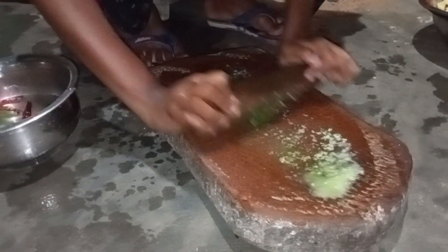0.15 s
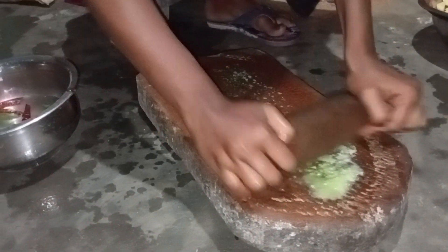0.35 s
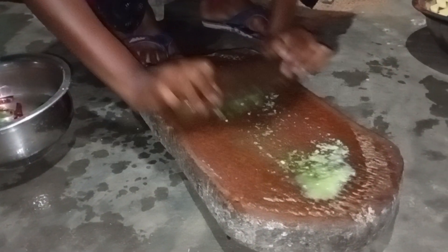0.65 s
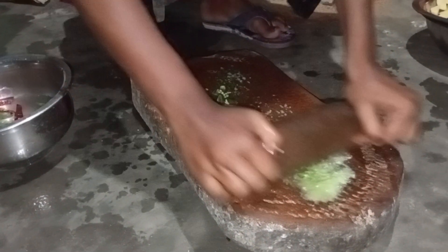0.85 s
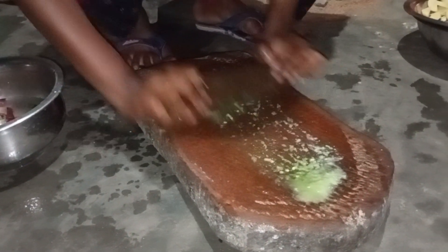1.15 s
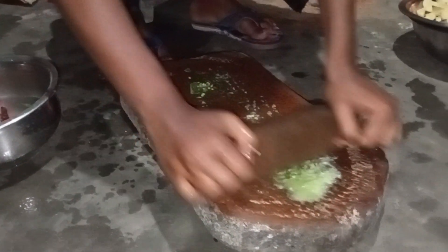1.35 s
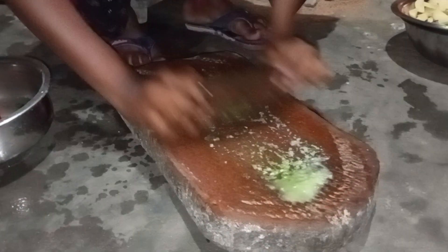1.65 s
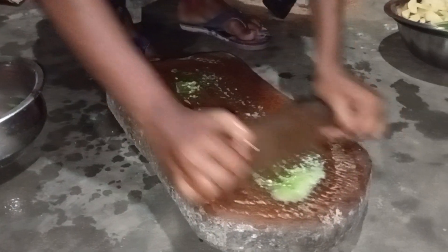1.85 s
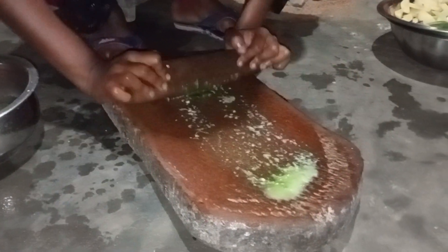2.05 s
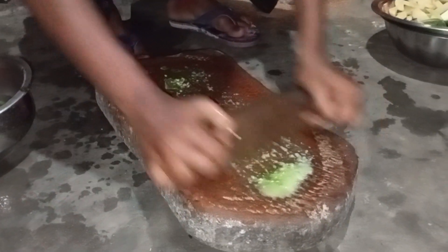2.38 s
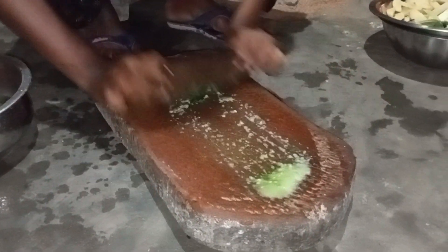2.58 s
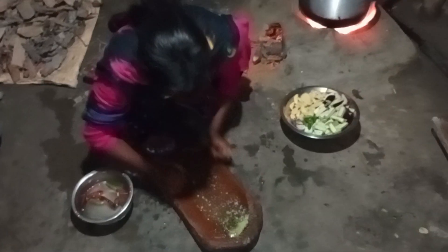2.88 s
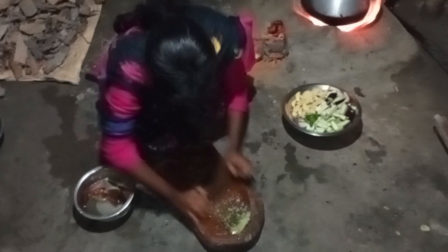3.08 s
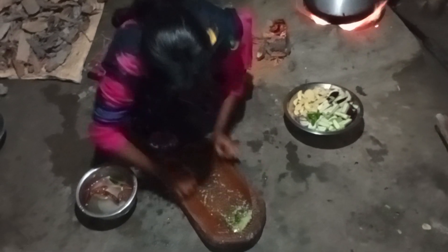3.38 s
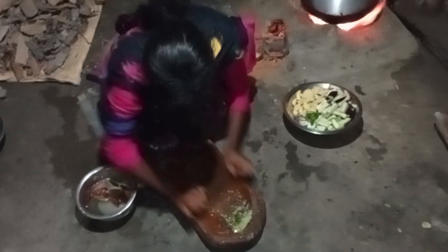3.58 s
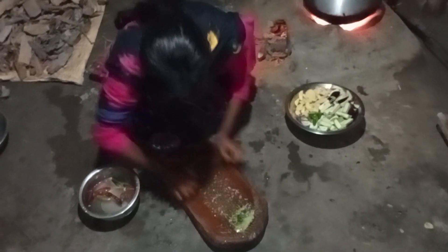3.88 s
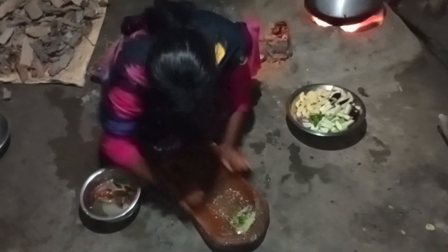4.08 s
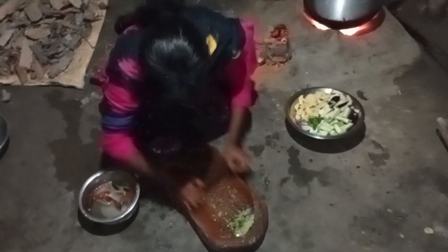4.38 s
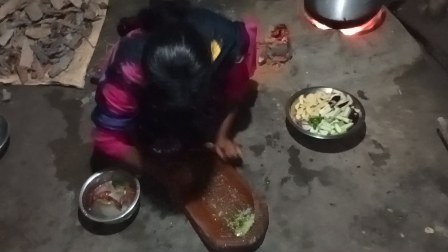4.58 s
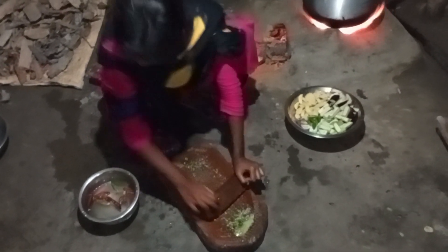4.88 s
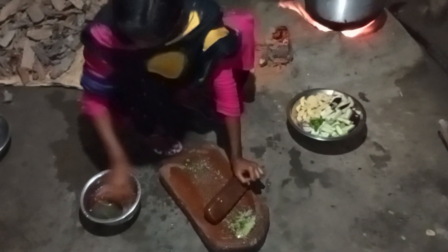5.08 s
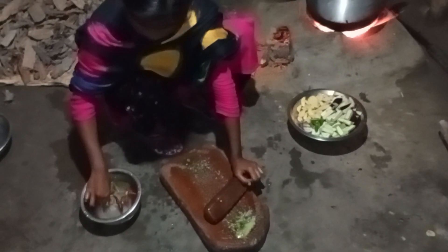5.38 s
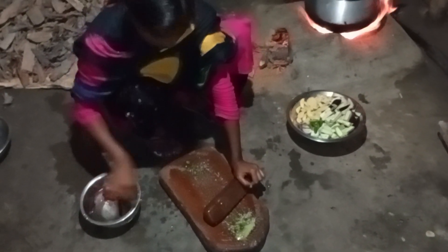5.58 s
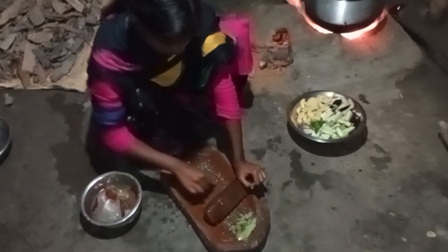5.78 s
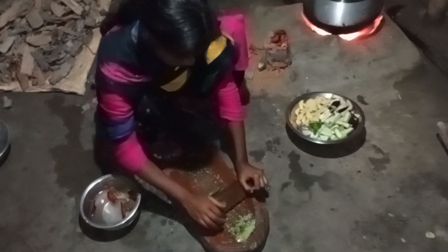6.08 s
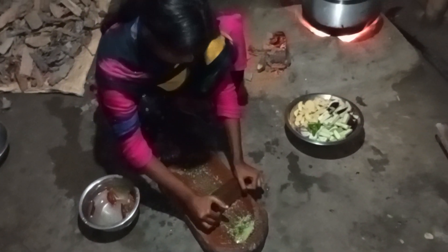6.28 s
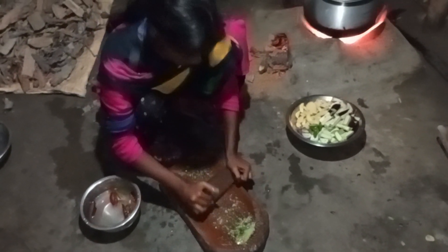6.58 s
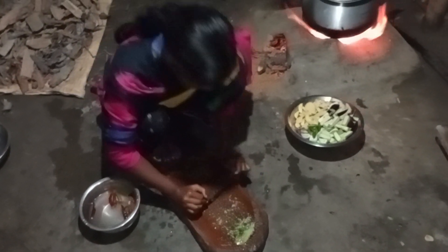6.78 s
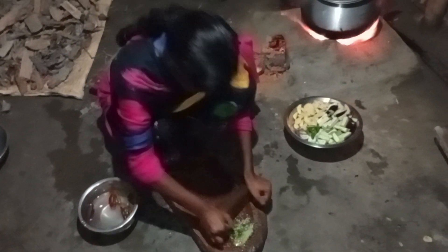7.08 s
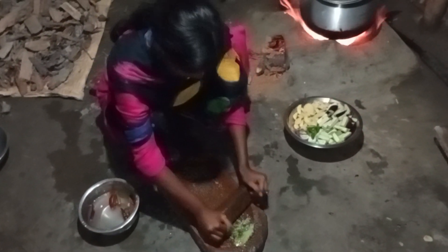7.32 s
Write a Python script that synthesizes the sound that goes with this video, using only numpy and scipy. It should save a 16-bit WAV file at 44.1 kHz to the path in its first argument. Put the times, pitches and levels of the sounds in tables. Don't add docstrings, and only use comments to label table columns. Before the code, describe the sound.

Rapid gritty grinding strokes on stone, with wet squelches and knocks; later lower-toned, then bangles clink, a steel bowl hums and the roller knocks again.

```python
import sys
import numpy as np
from scipy import signal
from scipy.fft import rfft, irfft, next_fast_len
from scipy.io import wavfile

SR = 44100
rng = np.random.default_rng(int(sys.argv[2]) if len(sys.argv) > 2 else 0)


def log_audio(samples):
    frames = np.atleast_2d(samples).T
    limited = np.clip(frames, -1, 1)
    pcm = np.round(limited * 32767).astype(np.int16)
    wavfile.write(sys.argv[1], SR, pcm)


def makeup_ratio(level_db):
    decades = np.asarray(level_db, float) / 20
    return 10 ** decades


N = 328545
SCENE_CHANGES_S = 2.78


# start in seconds, share of the stroke (0-1) at which it is fastest,
# grit level in dB, slush level in dB, song level in dB.
STROKES = [(0.234, 0.45, -42.5, -50, -56), (0.507, 0.72, -41, -55.5, -71),
           (0.773, 0.44, -37.5, -52.5, -55.5), (1.011, 0.61, -39.5, -55, -54), (1.264, 0.4, -38, -53, -50),
           (1.544, 0.47, -39, -59.5, -56.5), (1.768, 0.45, -39.5, -51.5, -47.5),
           (2.0, 0.57, -40.5, -55.5, -50.5), (2.255, 0.45, -41.5, -52, -48.5),
           (2.499, 0.56, -41, -56.5, -55.5), (2.743, 0.35, -45, -60, -53.5), (2.873, 0.47, -43.5, -73, -50),
           (3.132, 0.44, -45, -61.5, -39.5), (3.394, 0.57, -46.5, -70, -42.5), (3.656, 0.42, -47, -61, -37),
           (3.911, 0.53, -46, -66, -44.5), (4.172, 0.46, -46.5, -56, -33), (4.432, 0.54, -48, -69, -40),
           (4.704, 0.22, -51, -58.5, -37), (7.042, 0.27, -52.5, -54, -39)]


def stroking(db, power, creep_db, late=0):
    longest_s, creep_s = 0.285, 0.03
    start, fastest = np.transpose(STROKES)[:2, :, None]
    t = milliseconds()
    since = t - start
    length = np.minimum(np.diff(start, axis=0, append=np.inf), longest_s)
    bend = np.log(0.5) / np.log(np.clip(fastest + late, 0.15, 0.85))
    speed = np.sin(np.pi * np.clip(since / length, 0, 1) ** bend).clip(0)
    is_push = (np.arange(len(start)) % 2 == 0)[:, None]
    follows_on = np.diff(start, axis=0, prepend=-np.inf) < longest_s
    creep = is_push * follows_on * makeup_ratio(creep_db) * np.exp(-(since / creep_s) ** 2)
    return np.sum(makeup_ratio(db)[:, None] * (speed ** power + creep), axis=0)


SONG_LATE = [0.061, -.1, 0.083, -0.15, -0.068, -0.052, -0.077, -.15, -0.12, -0.15, -0.06, -0.036, .1, -0.12,
             0.023, -.1, -0.043, 0.032, 0.059, -0.2]
# start in seconds, hold in seconds,
# grit level in dB, slush level in dB, song level in dB.
SCUFFS = [(0.067, 0.022, -42.5, -53, -68), (0.134, 0.017, -45, -48.5, -72), (0.289, 0.012, -38.5, -52, -84),
          (0.361, 0.018, -34.5, -50, -79), (0.534, 0.054, -58, -64.5, -59.5),
          (0.796, 0.013, -49.5, -58, -49), (2.494, 0.0063, -86, -67, -73), (4.643, 0.035, -58, -58.5, -53),
          (5.093, 0.092, -48.5, -52.5, -65), (5.201, .42, -68, -65.5, -78), (5.631, 0.016, -56, -53, -68),
          (5.849, 0.021, -61, -59, -59), (5.97, 0.66, -66.5, -72.5, -82), (6.337, 0.027, -47, -47.5, -64),
          (6.39, 0.1, -54.5, -106.5, -74), (6.413, 0.26, -63.5, -57.5, -41),
          (6.671, 0.046, -68, -59, -41.5), (6.794, 0.12, -72.5, -72.5, -76),
          (6.914, 0.017, -56, -47.5, -82), (7.119, 0.026, -44, -57, -77), (7.358, 0.023, -60.5, -56, -78),
          (7.39, 0.053, -55, -61, -78)]
# start in seconds, hold in seconds, level in dB.
JOLTS = [(0.07, .01, -51), (0.14, .01, -53), (0.42, 0.014, -48.5), (0.57, 0.02, -41), (0.68, 0.0092, -51),
         (0.84, 0.0082, -44), (0.91, 0.0076, -39.5), (1.07, 0.0071, -42.5), (1.44, 0.0075, -42),
         (1.52, 0.027, -42.5), (1.915, 0.0076, -35.5), (2.04, 0.039, -42), (2.41, 0.012, -39.5),
         (2.49, 0.071, -46.5), (3.25, 0.069, -51.5), (3.75, 0.08, -52), (5.09, 0.031, -39.5),
         (5.15, 0.46, -57.5), (5.63, 0.018, -46), (5.85, 0.58, -63), (6.335, 0.055, -41.5),
         (6.45, 0.45, -58.5), (6.92, 0.011, -45.5), (7.22, 0.017, -44.5), (7.36, 0.085, -47)]


def rubbing():
    grit_db, slush_db, song_db = np.transpose(STROKES)[2:]
    scuffs = np.array(SCUFFS)
    grit_scuff, slush_scuff, song_scuff = [
        gestures(scuffs[:, [0, 1, k]], rise_s=0.0027, fall_db_per_s=235.5) for k in (2, 3, 4)]
    jolts = gestures(JOLTS, rise_s=0.0034, fall_db_per_s=392)
    late = np.array(SONG_LATE)[:, None]
    layers = [stroking(grit_db, 2.21, -22.5) + grit_scuff,
              stroking(slush_db, 2, -22.5) + slush_scuff,
              stroking(song_db, 3.27, -29, late) + song_scuff,
              stroking(slush_db - 7.5, 2.6, -22.5) + jolts]
    rest_db = (-68, -76.5, -79.5, -67)
    return [as_db(layer + makeup_ratio(rest)) for layer, rest in zip(layers, rest_db)]


# frequency in Hz, level in dB per Hz.
GRIT = [(2060, -49.5), (3500, -10), (4510, -7.5), (5290, -5), (7130, -1), (9260, 3.5), (10400, 1),
        (14900, -11.5), (16000, -20.5)]
# frequency in Hz, level in dB per Hz.
SLUSH = [(900, -25), (1500, -7), (2200, -2), (2750, 6), (3300, 3), (4500, -3.5), (6500, -48)]


def grit(hiss_db, slush_db):
    chatter = makeup_ratio(1.6 * drift(56))
    hiss = makeup_ratio(hiss_db - 0.5) * rms_one(colour(spread(9000, 2.8, 0.3), GRIT))
    dull = signal.sosfilt(signal.butter(2, 11510, fs=SR, output="sos"), hiss)
    t = np.arange(N) / SR
    hiss = np.where((t > 4.95) & (t < 7.04), dull, hiss)
    slush = makeup_ratio(slush_db) * rms_one(colour(spread(5000, 3.4, 0.18), SLUSH))
    return patchy(chatter * (hiss + slush), patch_db=1.45)


def spread(per_s, spread_db, shared):
    common, *own = grains(per_s, spread_db, (3, N))
    both = later_right(np.array([common, common]), 0.000206)
    return np.sqrt(shared) * both + np.sqrt(1 - shared) * np.array(own)


def patchy(x, patch_db):
    size = next_fast_len(N)
    edges = 1500 * 2 ** np.arange(0, 3.6, 0.5)
    spectrum = rfft(x, size)
    band = np.searchsorted(edges, np.arange(size // 2 + 1) * SR / size)
    out = np.zeros_like(x)
    for k in range(len(edges) + 1):
        out += makeup_ratio(patch_db * drift(11.0)) * irfft(spectrum * (band == k), size)[:, :N]
    return out


# frequency in Hz, level in dB per Hz.
SLAB = [(120, -29.5), (250, 2.5), (400, 0.5), (700, -9), (1000, -10.5), (1800, -18.5), (2500, -28)]
# frequency in Hz, level in dB, 60 dB decay in seconds.
RUBBED_NEAR = [(1260, -3, .06), (1320, 0, .055), (1480, -14, .03), (2870, -9, .014)]
# frequency in Hz, level in dB, 60 dB decay in
# seconds.
RUBBED_FAR = [(265, -7, .06), (700, -19, .06), (1040, -11, .07), (1228, 0, .1), (1300, -12, .05),
              (1480, -10, .035), (2700, -6, .03), (2860, -8, .03)]


def grinding(song_db, slab_db):
    slab = rms_one(colour(grains(2000, 2.8), SLAB))
    lumps_db = 2.0 * drift(30)
    song_db = song_db + 0.15 * lumps_db
    force = grains(5600, 0.84)
    near = np.arange(N) < SCENE_CHANGES_S * SR
    song = driven(RUBBED_NEAR, force * near, song_db - 0.5)
    song += driven(RUBBED_FAR, force * ~near, song_db - 8.5)
    return makeup_ratio(slab_db - 5.5 + lumps_db) * slab + song


# frequency in Hz, level in dB, 60 dB decay in seconds.
ROLLER = [(434, -18.5, 0.025), (687, -24, 0.037), (1075, -24.5, 0.08), (1249.4, 6.5, 0.065),
          (1301, -7, 0.039), (1410, -9, 0.093), (1470, -15.5, 0.07), (1667, -26.5, .06), (1860, -25, .07),
          (2140, -27.5, .05), (2530, -16.5, .09), (2695, -14, 0.073), (2955, -19.5, .06)]
# frequency in Hz, level in dB per Hz.
SCATTER = [(400, -28), (650, -8), (900, -12), (1500, 3.5), (2000, -8), (2700, -9), (3400, -17.5),
           (4500, -34)]
# time in seconds, peak in dB, scattered grit in dB, left minus right in dB.
KNOCKS = [(0.144, 1, -18, 3), (0.582, -43.5, -13, 4), (0.595, -40.5, -13, 6), (0.7375, -29, -11.5, 1.5),
          (0.806, -47, -18, 2), (0.848, -36, -25, 4), (0.916, -21, -15.5, 2), (1.916, -42.5, -31, 8),
          (2.413, -44, -2, 0), (2.483, -46, -8, 1), (2.777, -44, -24, 0), (3.19, -30, -10, -0.5),
          (3.244, -33, -27, -1), (3.599, -43, -6, 1), (3.71, -45, -11, -6), (4.125, -34.5, -14.5, 0),
          (4.242, -48, -11, -2), (4.756, -46.5, 4, 2), (6.79, -30.5, -18, 1), (6.844, -45.5, -22, -1),
          (6.925, -18, -14, -0.5), (7.227, -32, -11.5, -2)]


def knocks():
    s, db, scatter_db = np.transpose(KNOCKS)[:3]
    db = np.minimum(db, -6)
    luck_db = rng.normal(0, 1.5, (len(s), len(ROLLER)))
    t = np.arange(N) / SR
    gripped = (t > 0.3) & (t < 4.9)
    far = t > SCENE_CHANGES_S
    out = np.zeros(N)
    for k, (hz, level_db, t60) in enumerate(ROLLER):
        clicks = np.zeros(N + SR)
        strength = makeup_ratio(db + level_db - 6.5 + luck_db[:, k])
        second_s = s + round(0.003 * hz) / hz
        clicks[(s * SR).astype(int)] = strength
        clicks[(second_s * SR).astype(int)] = 0.65 * strength
        blunt = signal.butter(1, [hz / 1.25, hz * 1.25], "band", fs=SR, output="sos")
        swell = signal.sosfilt(blunt, clicks[:N])
        for held in (False, True):
            struck = swell * (gripped == held)
            decay = t60 * 0.84 ** held
            out += ring(struck * ~far, hz, decay)
            out += ring(struck * far, hz * 0.988, decay)
    blows = np.zeros(N)
    blows[(s * SR).astype(int)] = makeup_ratio(db + scatter_db)
    dying = signal.lfilter([1], [1, -makeup_ratio(-60 / (0.11 * SR))], blows + 1e-18)
    return out + dying * rms_one(colour(rng.standard_normal(N), SCATTER))


def leaning(x):
    s, pan_db = np.transpose(KNOCKS)[[0, 3]]
    latest = np.maximum(np.searchsorted(s, np.arange(N) / SR) - 1, 0)
    side_db = pan_db[latest]
    return x * makeup_ratio([side_db / 2, -side_db / 2])


# time in seconds, peak in dB, frequency in Hz, 60 dB decay in seconds.
THUMPS = [(0.419, -29, 200, 0.077), (0.921, -24.5, 168, 0.1), (1.439, -20.5, 175.3, 0.063),
          (1.916, -21, 179, 0.054), (2.07, -29.5, 204.6, 0.13), (2.42, -27, 171, 0.11),
          (2.771, -21, 59.3, 0.052), (3.191, -35, 248, 0.2), (3.719, -32, 260, 0.13),
          (4.12, -35.5, 260.5, 0.18), (4.249, -25.5, 269, 0.049), (4.57, -35, 189.6, 0.26),
          (4.75, -41.5, 275.6, 0.37), (5.135, -29, 328, 0.14), (6.38, -36, 335, 0.15)]


def thumps():
    return pushed(THUMPS, rise_s=0.0084)


# time in seconds, peak in dB, pitch in Hz.
CRACKS = [(0.0762, -17, 10400), (0.1282, -24, 6960), (0.1758, -22, 7200), (0.2514, -30, 9270),
          (0.2793, -22, 6400), (0.2943, -27, 8730), (0.3797, -10, 7800), (0.3884, -4, 6500),
          (0.4135, -5.5, 8550), (0.6827, -31, 9800), (0.8135, -17.5, 9200), (1.143, -39, 9200),
          (2.1123, -30, 9200), (2.5876, -23, 9750), (4.0482, -19, 10300), (4.5065, -22.5, 9860),
          (5.6335, -35, 8280), (6.3377, -30, 8670), (7.1286, -18, 10500), (7.401, -29.5, 7500)]


def cracks():
    out, t = np.zeros(N + 400), np.arange(400) / SR
    for s, db, hz in CRACKS:
        i = int(s * SR)
        out[i:i + 400] += makeup_ratio(db - 6.0) * np.sin(2 * np.pi * hz * t) * np.exp(-t / 0.00049)
    return out[:N]


# time in seconds, peak in dB, frequency in Hz, 60 dB decay in seconds.
DRIPS = [(4.645, -47, 875, 0.043), (4.665, -42, 770, 0.055), (4.68, -43, 900, 0.052),
         (4.7, -46.5, 830, 0.04), (5.85, -53.5, 1125, 0.083), (5.852, -52.5, 3050, 0.085),
         (6.01, -49.5, 3090, .06), (6.03, -61, 1890, 0.26), (6.09, -58, 1860, 0.2), (6.21, -61, 1790, 0.22),
         (6.345, -44.5, 890, 0.079)]


def drips():
    return pushed(DRIPS, rise_s=0.00061)


# frequency in Hz, level in dB, 60 dB decay in seconds.
BANGLES = [(7210, 0, .1), (8230, -5, .12), (8520, -1, .1), (9780, -3, .1), (9990, -5, .1),
           (12000, -14, .08)]
# start in seconds, hold in seconds, level in dB.
JINGLE = [
    (1.45, 0.036, -47),
    (5.13, 0.06, -50),
    (5.64, .01, -59),
    (6.385, .005, -36),
    (6.445, 0.042, -40.5),
    (7.395, 0.0027, -33.5),
    (7.42, .03, -58),
]


def bangles():
    jingle_db = as_db(gestures(JINGLE, rise_s=0.0033, fall_db_per_s=612))
    clinks = grains(600, 3.0) * (jingle_db > -66)
    return driven(BANGLES, clinks, jingle_db)


# frequency in Hz, level in dB, 60 dB decay in seconds.
BOWL = [(302.2, 12.5, 0.21), (335, 18.5, 0.203), (870, -5, 0.043), (2720, -2, .05), (2930, 3, 0.06)]
# start in seconds, hold in seconds, level in dB.
STIR = [
    (5.09, 0.019, -34.5),
    (5.13, 0.01, -32),
    (5.18, 0.34, -40.5),
    (5.5, 0.16, -55.5),
    (5.85, 0.27, -44),
    (6.34, 0.012, -30.5),
    (6.6, 0.26, -50),
    (6.85, 0.25, -41.5),
    (7.38, .07, -40),
]


def bowl():
    stir_db = as_db(gestures(STIR, rise_s=0.0089, fall_db_per_s=230))
    return driven(BOWL, grains(2000, 1.7), stir_db - 9.0)


# start in seconds, hold in seconds, level in dB.
CRICKET = [
    (3.33, 1.06, -64.5),
    (6.1, 0.76, -64),
]


def cricket():
    t = np.arange(N) / SR
    chirps_per_s, note_hz = 21.35, 5530
    throb = np.maximum(np.sin(2 * np.pi * chirps_per_s * t + 0.1), 0)
    song_db = as_db(gestures(CRICKET, rise_s=0.037, fall_db_per_s=400)) + 2.0 * drift(10)
    return makeup_ratio(song_db) * throb * np.sin(2 * np.pi * note_hz * t)


# time in seconds, firing rate in Hz, level in dB.
ENGINE = [
    (0, 25.94, -47),
    (.6, 26.78, -44.5),
    (1.2, 29.27, -45),
    (1.9, 31.98, -50),
    (2.55, 35.37, -50),
    (2.76, 35.15, -51),
]
# multiple of the firing rate, level in dB.
ENGINE_ORDERS = [(2, -34), (3, -13), (4, 0.5), (5, -1.5), (6, -3.5), (7, -27.5), (8, -51.5)]


def engine():
    gone = (2.79, 34.8, -103)
    firing_hz, level_db = in_time(list(ENGINE) + [gone])
    turn = 2 * np.pi * np.cumsum(firing_hz) / SR
    orders = sum(makeup_ratio(db + 2.3 * drift(36)) * np.sin(k * turn + k * k) for k, db in ENGINE_ORDERS)
    return makeup_ratio(level_db) * orders


# frequency in Hz, level in dB.
HUM = [(51.2, -36.5), (102.3, -1.5), (204.6, -7.5)]
# time in seconds, rumble in dB, hum in dB.
BACK = [
    (0.0, -49.5, -83),
    (0.37, -48, -47),
    (2.24, -49.5, -42),
    (2.92, -50, -48),
    (5.23, -50, -51.5),
    (6.25, -50.5, -48.5),
    (6.56, -46, -56),
    (7.05, -52.5, -50.5),
    (7.45, -52, -52),
]


def mains_hum():
    t = np.arange(N) / SR
    hum = sum(makeup_ratio(db + 2 * drift(4.8)) * np.sin(2 * np.pi * hz * t) for hz, db in HUM)
    return makeup_ratio(in_time(BACK)[1] - 1.5) * hum


# frequency in Hz, level in dB per Hz.
RUMBLE = [(25, -47), (40, -12), (52, 2), (75, -6.5), (105, 2), (150, -1), (210, -2.5), (300, -7.5),
          (400, -16), (600, -23.5), (1000, -46.5), (2000, -80)]
# frequency in Hz, level in dB per Hz.
AIR = [(410, -48), (700, 3.5), (819, -41), (1870, -7.5), (2020, -6), (3940, -13.5), (5760, -4),
       (6320, -6.5), (8990, -8.5), (12500, -24.5), (16000, -42)]


def background():
    rumble = rms_one(colour(alike_below(rng.standard_normal((3, N))), RUMBLE))
    air = rms_one(colour(alike_below(rng.standard_normal((3, N))), AIR))
    return makeup_ratio(in_time(BACK)[0] + 0.9 * drift(6.0)) * rumble + makeup_ratio(-65) * air


def alike_below(noise):
    b, a = signal.butter(1, 600, "high", fs=SR)
    return noise[0] + signal.lfilter(b, a, noise[1:] - noise[0])


def room():
    t60_s, tail_db = 0.26, -8.0
    t = np.arange(int(0.4 * SR)) / SR
    tail = alike_below(rng.standard_normal((3, len(t)))) * makeup_ratio(-60 * t / t60_s) * (t > 0.003)
    tail *= makeup_ratio(tail_db) / np.sqrt(np.sum(tail ** 2, axis=1, keepdims=True))
    tail[:, 0] += 1
    return tail


def heard(x, tail):
    return later_right(signal.fftconvolve(x[None], tail, axes=1)[:, :N], 0.00012)


def later_right(x, lag_s):
    return np.array([x[0], np.interp(np.arange(N) - lag_s * SR, np.arange(N), x[1])])


def milliseconds():
    return np.arange(N * 1000 // SR + 2) / 1000


def gestures(rows, rise_s, fall_db_per_s):
    start, hold_s, db = np.transpose(rows)[:, :, None]
    t = milliseconds() - start
    attack = np.clip(t / rise_s, 0, 1) ** 2
    released_s = np.maximum(t - rise_s - hold_s, 0)
    return np.sum(attack * makeup_ratio(db - fall_db_per_s * released_s), axis=0)


def as_db(pressure):
    t = np.arange(N) / SR
    return 20 * np.log10(np.interp(t, np.arange(len(pressure)) / 1000, pressure) + 1e-6)


def in_time(rows):
    s, *columns = np.transpose(rows)
    return [np.interp(np.arange(N) / SR, s, c) for c in columns]


def rms_one(x):
    return x / np.sqrt(np.mean(x ** 2) + 1e-20)


def colour(x, points):
    size = next_fast_len(N)
    hz, db = np.transpose(points)
    bins_hz = np.arange(size // 2 + 1) * SR / size
    gain = makeup_ratio(np.interp(np.log(bins_hz + 1), np.log(hz), db))
    return irfft(rfft(x, size) * gain, size)[..., :N]


def drift(rate):
    r = np.exp(-2 * np.pi * rate / SR)
    return rms_one(signal.lfilter([1], [1, -2 * r, r * r], rng.standard_normal(N + SR))[SR:])


def grains(per_s, spread_db, shape=N):
    sizes = makeup_ratio(spread_db * np.minimum(rng.exponential(1, shape), 5)) * rng.choice([-1, 1], shape)
    return rms_one(sizes * (rng.random(shape) < per_s / SR))


def ring(clicks, hz, t60):
    r, w = makeup_ratio(-60 / (t60 * SR)), 2 * np.pi * hz / SR
    return signal.lfilter([0, np.sin(w)], [1, -2 * r * np.cos(w), r * r], clicks + 1e-18)


def driven(modes, force, db):
    norm = np.sqrt(sum(makeup_ratio(2 * level) * t60 for hz, level, t60 in modes) * SR / 27.6)
    push = force * makeup_ratio(db)
    return sum(makeup_ratio(level) * ring(push, hz, t60) for hz, level, t60 in modes) / norm


def pushed(events, rise_s):
    out = np.zeros(N)
    for s, db, hz, t60 in events:
        i = int(s * SR)
        t = np.arange(min(SR // 4, N - i)) / SR
        envelope = makeup_ratio(db - 60 * t / t60) * (1 - np.exp(-t / rise_s))
        out[i:i + len(t)] += envelope * np.sin(2 * np.pi * hz * t)
    return out


def scene():
    hiss_db, slush_db, song_db, slab_db = rubbing()
    tail = room()
    near = grinding(song_db, slab_db) + cracks() + drips() + bangles() + bowl()
    work = grit(hiss_db, slush_db) + heard(near, tail) + leaning(heard(knocks(), tail)) + thumps()
    return work + cricket() + engine() + mains_hum() + background()


def roll_off(x):
    return signal.sosfilt(signal.butter(12, 15830, fs=SR, output="sos"), x)


# frequency in Hz, left minus right in dB.
BALANCE_DB = [(200, -0.5), (1200, -1.5), (2200, -1), (6000, 0), (8600, -6.5), (11000, -5.5), (15000, -9.5)]


def record(dry):
    left = colour(dry[0], [(hz, db / 2) for hz, db in BALANCE_DB])
    right = colour(dry[1], [(hz, -db / 2) for hz, db in BALANCE_DB])
    mix = signal.sosfilt(signal.butter(3, 44, "high", fs=SR, output="sos"), [left, right])
    mix = signal.sosfilt(signal.cheby2(16, 60, 16000, fs=SR, output="sos"), mix)
    return roll_off(mix)


dry = scene()
out = record(dry)
log_audio(out)
```